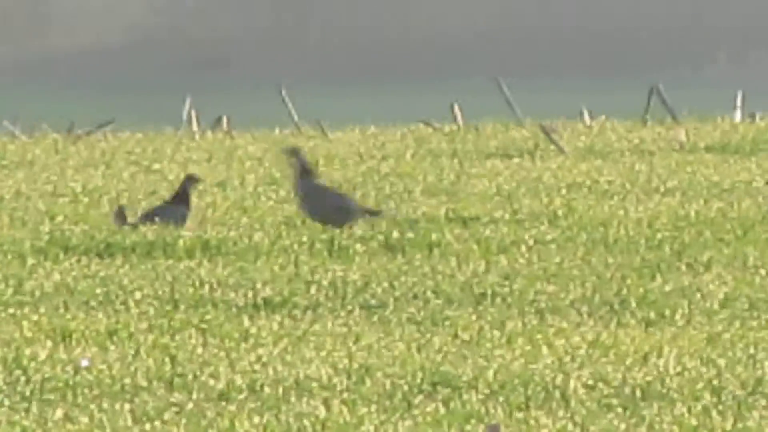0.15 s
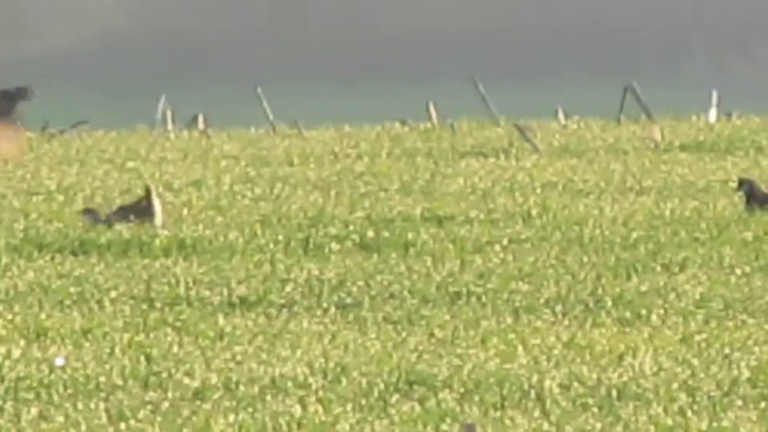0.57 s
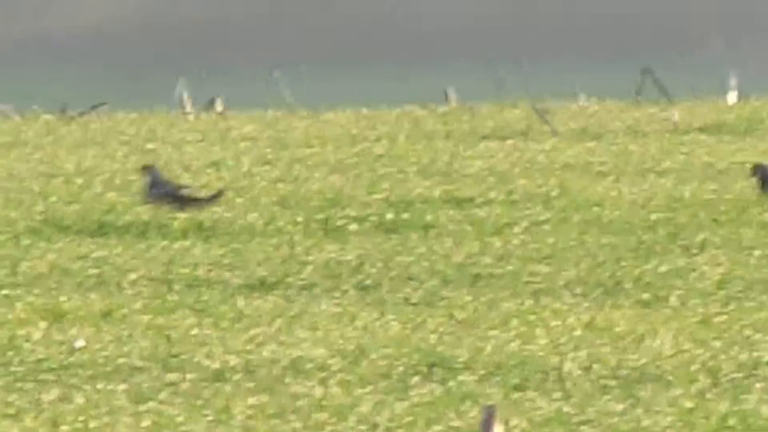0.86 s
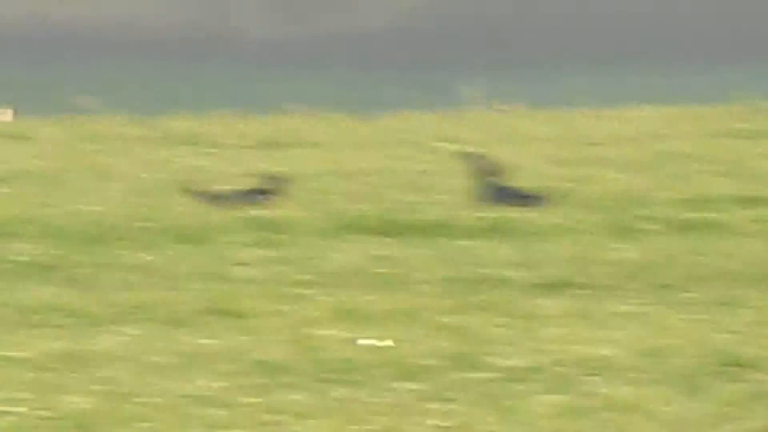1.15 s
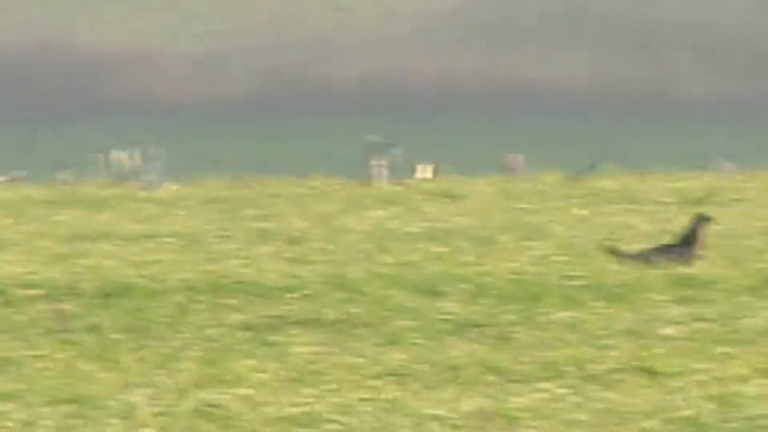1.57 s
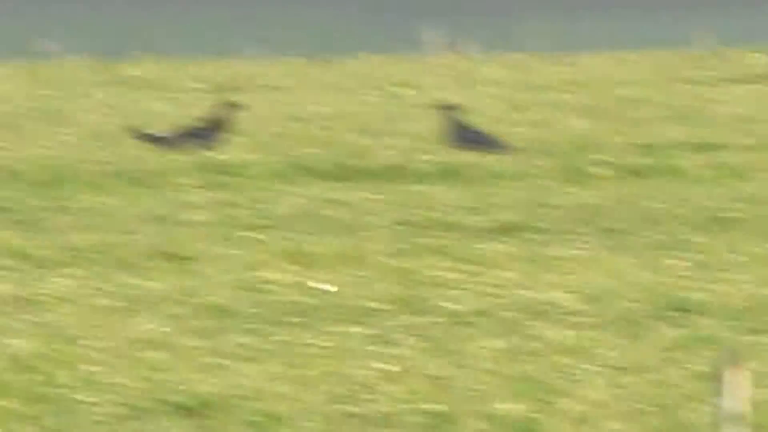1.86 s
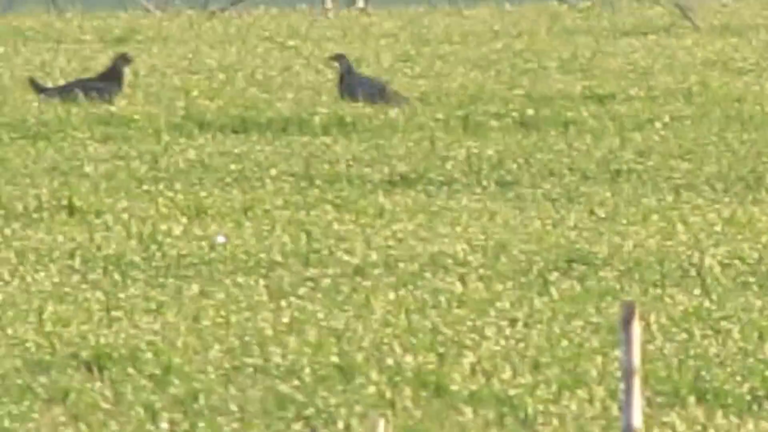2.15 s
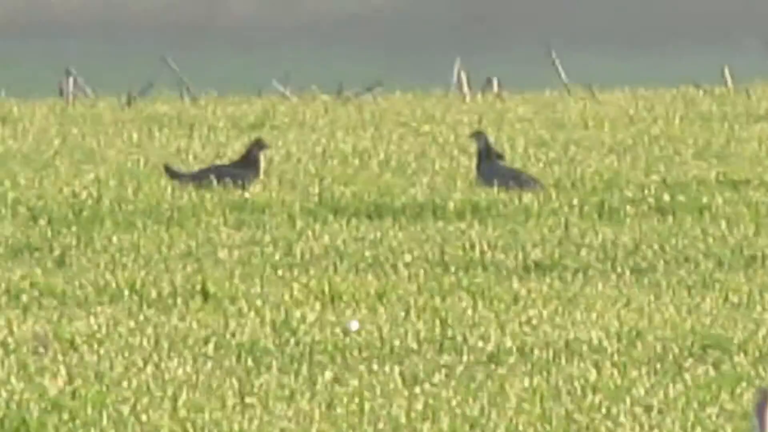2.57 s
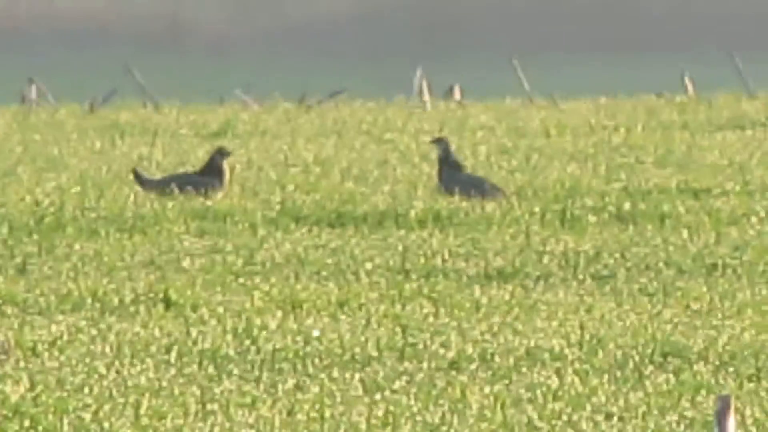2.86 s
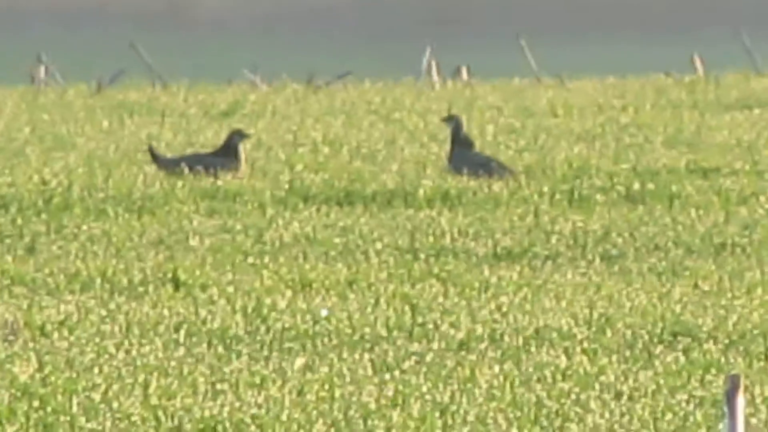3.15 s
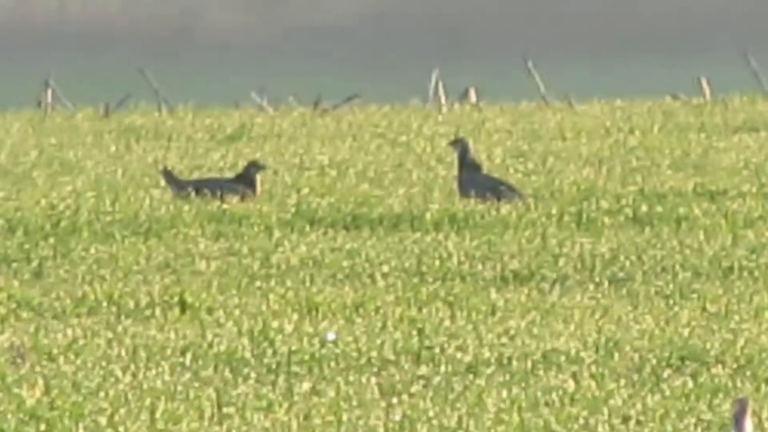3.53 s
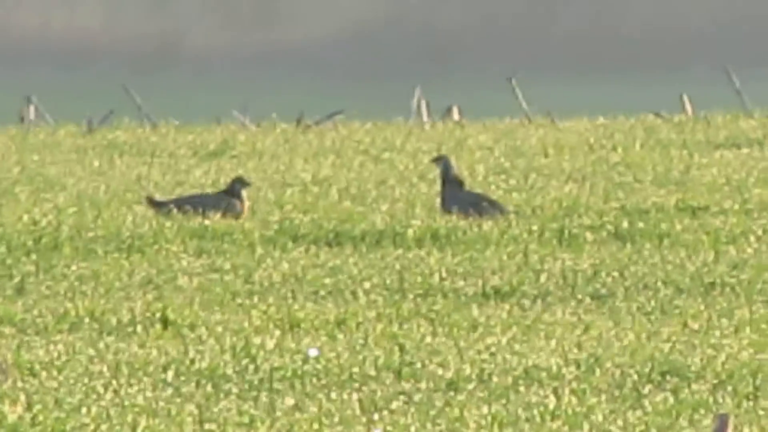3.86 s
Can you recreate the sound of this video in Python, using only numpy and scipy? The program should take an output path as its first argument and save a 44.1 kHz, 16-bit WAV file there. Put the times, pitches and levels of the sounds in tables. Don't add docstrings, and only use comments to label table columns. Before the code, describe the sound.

Low wind rumble dominates, gusty at first, calmer in the middle, then strongest at the close with slight overload crackle. Behind it are very faint distant songbirds, thin hiss, and a few tiny camera-body ticks near the microphone.

```python
import sys
import numpy as np
from scipy import signal
from scipy.fft import rfft, irfft
from scipy.io import wavfile
from scipy.ndimage import uniform_filter1d, minimum_filter1d

SR = 44100
rng = np.random.default_rng(int(sys.argv[2]) if len(sys.argv) > 2 else 0)


def generate_wav(sig):
    pcm = np.round(np.clip(np.atleast_2d(sig).T, -1, 1) * 32767).astype(np.int16)
    wavfile.write(sys.argv[1], SR, pcm)


def volts_from_decibels(level):
    exponent = np.asarray(level, float) / 20
    return 10 ** exponent


N = 176400


def evened(x):
    return x / np.sqrt(np.mean(x ** 2) + 1e-20)


def read(points, hz):
    f, value = np.transpose(points)
    return np.interp(np.log(hz + 1), np.log(f + 1), value)


def add(mix, s, sound):
    part = mix[..., max(round(s * SR), 0):][..., :sound.shape[-1]]
    part += sound[..., :part.shape[-1]]


def eddy_train(size):
    eddies_per_s, spread_db = 900, 3.5
    u, sign, big = rng.random((size, 3)).T
    kicks = (u < eddies_per_s / SR) * np.sign(sign - .5)
    return kicks * volts_from_decibels(-spread_db * np.log(big + 0.01))


def eddy_colour(hz, fall, cut_hz):
    return volts_from_decibels(-fall * hz / 1000) * hz ** 2 / (hz ** 2 + cut_hz ** 2)


def breeze(port):
    # t/s, left port level/dB, right port level/dB
    breeze_levels = [(0.0, -20, -21.5), (0.239, -21, -29), (0.332, -32, -29), (0.448, -21, -33),
                     (0.781, -38, -25), (0.87, -39.5, -35), (1.05, -28.5, -30.5), (1.45, -35, -33),
                     (1.85, -26.5, -25), (1.931, -32.5, -26), (2.048, -23, -23.5), (2.448, -26, -21),
                     (2.55, -30.5, -39), (2.721, -41, -45), (2.851, -29.5, -30), (3.4, -27.5, -28.5),
                     (3.797, -15, -23), (4.0, -14.5, -19.5)]
    s, level_db = np.transpose(breeze_levels)[[0, port]]
    hz, t, z = signal.stft(eddy_train(N), SR, nperseg=2048)
    fall = 25.6 - 2.5 * np.interp(t, s, level_db)
    colour = eddy_colour(hz[:, None], fall, cut_hz=53.4)
    z = z * colour / (np.linalg.norm(colour, axis=0) + 1e-9)
    x = signal.istft(z, SR, nperseg=2048)[1][:N]
    x = x / (abs(uniform_filter1d(x ** 2, size=4000)) + 1e-20) ** .5
    return x * volts_from_decibels(2 + np.interp(np.arange(N) / SR, s, level_db))


def gusts(rows):
    gust_s, gust_db, core = 0.012, -1, 7.53
    size = 8192
    half = size // 2
    out = np.zeros(N + size)
    t = (np.arange(size) - half) / SR
    hz = np.fft.rfftfreq(size, 1 / SR)
    for s, level_db, fall in rows:
        train = eddy_train(size)
        train[half] += core * rng.choice([-1, 1])
        train = train * np.exp(-.5 * (t / gust_s) ** 2)
        clump = irfft(rfft(train) * eddy_colour(hz, fall, cut_hz=74))
        add(out, s, volts_from_decibels(level_db + gust_db) * clump / np.std(clump[abs(t) < gust_s]))
    return out[half:N + half]


def wind():
    # t/s, level/dB, spectral fall/(dB per kHz)
    left_gusts = [(0.066, -9.5, 61), (0.231, -17, 40.5), (0.464, -14, 61.5), (0.563, -17.0, 64),
                  (0.645, -17.5, 83), (0.995, -13, 80), (1.109, -14.5, 77), (1.244, -20.5, 81),
                  (1.664, -23.5, 97), (1.843, -30.5, 44), (2.065, -14, 70), (2.146, -12, 88),
                  (2.201, -14.5, 63), (2.306, -15, 71), (2.462, -14.5, 84), (2.831, -13.5, 96),
                  (3.123, -14, 83), (3.208, -9, 89), (3.49, -17, 62), (3.607, -19.5, 48),
                  (3.664, -16.5, 49), (3.734, -13.5, 41.5), (3.828, -21, 15.5), (3.862, -11, 23),
                  (3.931, -17.5, 30.5), (3.982, -11, 28), (0.285, -21, 62), (0.401, -27, 57),
                  (1.313, -25.5, 80), (1.51, -26.5, 75), (1.775, -29, 65), (1.991, -8, 77),
                  (2.264, -25, 60), (2.63, -29, 79), (3.301, -20, 71), (3.326, -21, 69),
                  (3.771, -20.5, 49.5), (3.887, -17, 34.5), (3.957, -17.5, 27)]
    # t/s, level/dB, spectral fall/(dB per kHz)
    right_gusts = [(0.093, -12.5, 74), (0.125, -15.5, 41), (0.169, -13, 51), (0.275, -18.5, 58.5),
                   (0.425, -9.5, 53.5), (0.48, -14.5, 62.5), (0.618, -19, 57), (0.78, -19.5, 58),
                   (1.245, -16, 82), (1.412, -15, 66), (1.722, -14.5, 90), (1.854, -14, 84),
                   (2.151, -13, 68.5), (2.232, -19, 66), (2.301, -17.5, 62), (2.438, -10.5, 67),
                   (2.946, -14.5, 78), (3.001, -12, 71), (3.166, -9.5, 55), (3.204, -12, 52),
                   (3.449, -13, 60), (3.528, -9.5, 71), (3.59, -8.5, 57), (3.668, -8, 52),
                   (3.837, -6.5, 39), (3.935, -12, 40), (0.023, -18.5, 50.5), (0.192, -15.5, 40),
                   (0.58, -24, 63), (0.717, -17, 73), (1.001, -24, 79), (1.099, -24.5, 69),
                   (1.334, -27, 79), (1.528, -24, 81), (1.782, -19.5, 73), (2.019, -18.5, 61),
                   (2.063, -20.5, 56), (2.349, -14, 59), (2.555, -21, 104), (2.618, -28, 84),
                   (3.232, -13.5, 67), (3.715, -15, 39), (3.796, -13, 53), (3.861, -15.5, 33.5)]
    left = breeze(port=1) + gusts(left_gusts)
    right = breeze(port=2) + gusts(right_gusts)
    widen = .5
    return np.array([left - widen * right, right - widen * left])


def hiss():
    # t/s, hiss level/dB
    gain_ride = [
        (0, -78.5),
        (0.498, -80.5),
        (1.102, -76),
        (2, -75),
        (3.1, -74.5),
        (3.2, -76.5),
        (3.802, -76),
        (3.85, -82),
    ]
    # f/Hz, density/(dB per Hz)
    hiss_tone = [(300, 4), (950, 2), (1500, -4), (2800, -10), (5500, -14.5), (10000, -18.5), (15700, -24.5)]
    # f/Hz, share
    likeness = [(1000, -0.34), (3100, 0.061)]
    frames, hz = N // 256 + 5, np.fft.rfftfreq(1024, 1 / SR)
    a, b, c, d, patches = rng.standard_normal((frames, 513, 5)).T
    patches = evened(uniform_filter1d(uniform_filter1d(patches, 10, 0), 8, 1))
    same = np.clip(read(likeness, hz), -1, 1)[:, None]
    left = a + 1j * b
    right = same * left + np.sqrt(1 - same ** 2) * (c + 1j * d)
    low_cut = hz[:, None] ** 2 / (hz[:, None] ** 2 + 300 ** 2)
    z = np.array([left, right]) * volts_from_decibels(read(hiss_tone, hz)[:, None] + 1.3 * patches) * low_cut
    x = evened(signal.istft(z, nperseg=1024, noverlap=768)[1][:, :N])
    level_db = 14 + np.interp(np.arange(N) / SR, *np.transpose(gain_ride))
    return x * volts_from_decibels(level_db) * np.array([[1.1], [.9]])


def overload_snaps():
    # t/s, peak level/dB, left over right/dB
    snap_events = [(0.0188, -48, 3), (0.0708, -29, 6.5), (3.1682, -29.5, -5.5), (3.17, -34, 2),
                   (3.214, -35.5, 3), (3.731, -39.5, 5.5), (3.7565, -42.5, -1), (3.7665, -32.5, 4),
                   (3.795, -39, -3), (3.802, -38.5, -4.5), (3.822, -39.5, -8.5), (3.836, -41, 2.5)]
    out, t = np.zeros((2, N)), np.arange(2000) / SR
    rate = 2 * np.pi * 3000
    kink = (1 - rate * t / 3) * np.exp(-rate * t)
    for s, db, pan_db in snap_events:
        add(out, s, volts_from_decibels(db) * np.outer([volts_from_decibels(pan_db / 2), -volts_from_decibels(-pan_db / 2)], 2 * kink))
    return out


def note(length, from_hz, to_hz, level_db, husk_hz, swell_db):
    u = np.linspace(0, 1, round(length * SR))
    turn = np.exp(2j * np.pi * np.cumsum(from_hz + (to_hz - from_hz) * u) / SR)
    r = np.exp(-np.pi * husk_hz / SR)
    flutter = signal.lfilter([1], [1, -r], rng.standard_normal((2, len(u) + 999)))[:, -len(u):]
    flutter = (flutter[0] + 1j * flutter[1]) * np.sqrt(1 - r * r)
    wobble = .3 * flutter + .7 if husk_hz < 200 else .6 * flutter
    arch = abs(np.sin(np.pi * u)) ** 0.23
    return volts_from_decibels(level_db + swell_db * (u - .5)) * arch * (turn * wobble).real


def sing(rows, husk_hz, swell_db=0):
    out = np.zeros(N)
    for s, *row in rows:
        add(out, s, note(*row, husk_hz, swell_db))
    return out


def trill(first, rate, length, from_hz, to_hz, level_db, swell_db, count):
    notes = []
    for k in range(count):
        swell = -swell_db * abs(2 * k / count - 1.1)
        uneven = 1.2 * rng.standard_normal()
        notes.append((first + k / rate, length, from_hz, to_hz, level_db + swell + uneven))
    return notes


def warbling():
    # delay/s, length/s, from f/Hz, to f/Hz, level/dB
    warble_notes = [
        (0, 0.032, 1970, 2350, -64.5),
        (0.015, 0.038, 2070, 2650, -68.5),
        (0.028, .08, 1980, 1990, -65.5),
        (0.107, 0.016, 2450, 2000, -57.5),
        (0.125, 0.033, 2414, 2010, -61),
    ]
    # t/s, level/dB, pitch factor
    warble_calls = [
        (1.942, -7, 0.82),
        (2.295, -1, 0.97),
        (2.934, 5.5, 0.99),
        (3.584, -1, 0.97),
    ]
    return [(s + delay, length, a * pitch, b * pitch, db + up)
            for s, up, pitch in warble_calls
            for delay, length, a, b, db in warble_notes]


def birds():
    # t/s, length/s, from f/Hz, to f/Hz, level/dB
    right_whistles = [
        (.04, 0.11, 3240, 2870, -73),
        (.44, 0.096, 3150, 2980, -67),
        (.555, 0.082, 2810, 2690, -69.5),
        (2.105, 0.135, 6350, 4500, -66.5),
    ]
    whistle_notes = [(.301, 0.17, 4400, 4040, -78), (.531, .205, 3490, 3240, -75.5),
                     (.741, 0.18, 3380, 3405, -74), (1.951, 0.11, 1810, 1694, -73),
                     (2.581, 0.065, 1475, 1465, -66), (2.858, 0.15, 5670, 5080, -65.5),
                     (3.026, .052, 5000, 4900, -63), (3.081, 0.072, 4710, 4110, -61.5),
                     (3.331, 0.12, 4860, 4540, -60.5), (3.456, 0.08, 4730, 4710, -66),
                     (3.545, 0.12, 3840, 3390, -62.5), (3.598, 0.057, 5840, 4560, -64.5)]
    chirp_notes = [(.306, .026, 2330, 2280, -70), (1.442, .066, 4640, 3830, -67),
                   (1.509, .022, 3920, 4040, -62.5), (1.753, 0.046, 4790, 4420, -69),
                   (1.808, 0.034, 4100, 4090, -64), (2.031, 0.052, 2300, 2123, -64),
                   (2.641, 0.029, 1913, 1506, -59), (2.646, 0.043, 1048, 744, -60),
                   (2.691, .031, 1063, 840, -62.5), (2.781, 0.033, 757, 818, -61),
                   (2.791, .091, 4030, 3820, -66), (2.801, .081, 3660, 3490, -64.5),
                   (2.866, .061, 3740, 4740, -60.5), (3.246, 0.035, 2116, 1955, -64),
                   (3.411, .041, 2015, 2210, -64)]
    fading_notes = [
        (3.161, 0.055, 4170, 4160, -69),
        (3.649, .031, 3380, 3600, -71),
        (3.676, .325, 3574, 3505, -68),
    ]
    low_trill = trill(first=1.151, rate=16.3, length=.03, from_hz=930, to_hz=815,
                      level_db=-59, swell_db=3, count=12)
    flicks = trill(first=2.981, rate=15.05, length=.018, from_hz=3850, to_hz=5750,
                   level_db=-61, swell_db=12.5, count=13)
    high_trill = trill(first=2.983, rate=15.05, length=.011, from_hz=4250, to_hz=4500,
                       level_db=-54, swell_db=15, count=13)
    left = sing(whistle_notes, husk_hz=40, swell_db=8.5)
    left += sing(chirp_notes, husk_hz=260)
    left += sing(high_trill + low_trill + warbling(), husk_hz=190)
    left += sing(flicks, husk_hz=400)
    left += sing(fading_notes, husk_hz=60, swell_db=-15)
    right = sing(right_whistles, husk_hz=40)
    return np.outer([1.3, .7], left) + np.outer([.3, 1.6], right)


def jabs():
    # t/s, peak level/dB, spectral fall/(dB per kHz)
    jab_events = [(0.094, -26, 27.5), (0.124, -25, 26), (2.024, -25.5, 39.5), (3.167, -19.5, 24),
                  (3.204, -22, 31), (3.589, -18.5, 31.5), (3.768, -20, 31), (3.859, -21, 11.5),
                  (3.884, -26.5, 16), (3.96, -21.5, 16), (3.98, -18, 15.5)]
    out, hz = np.zeros(N + 2048), np.fft.rfftfreq(2048, 1 / SR)
    for k, (s, db, fall) in enumerate(jab_events):
        bump = np.roll(irfft(eddy_colour(hz, fall, cut_hz=110)), shift=1024)
        add(out, s, (-1) ** k * volts_from_decibels(db) * bump / bump.max())
    return np.outer([1.6, .4], out[1024:N + 1024])


def body_knock():
    # f/Hz, level/dB, t60/s
    knock_modes = [(1200, -2.5, 0.028), (1480, 5.5, 0.016), (1820, 6, 0.029), (2510, -3.5, 0.035),
                   (3710, -7, .03)]
    out, t = np.zeros((2, N)), np.arange(2000) / SR
    ring = sum(volts_from_decibels(db - 60 * t / t60) * np.sin(2 * np.pi * hz * t) for hz, db, t60 in knock_modes)
    ring = ring * np.minimum(t / 0.00041, 1)
    add(out, .5215, volts_from_decibels(-44.5) * np.outer([1.8, -.3], ring))
    return out


def body_ticks():
    # t/s, peak level/dB
    tick_events = [(0.95, -59), (1.0106, -62.5), (1.195, -52.5), (1.2461, -53), (1.257, -61), (1.261, -61),
                   (1.3364, -50.5), (1.4463, -55.5), (0.943, -65.5), (1.026, -65), (1.055, -62),
                   (1.066, -58), (1.1, -57), (1.118, -67.5), (1.207, -60), (1.302, -62), (1.376, -65)]
    out, t = np.zeros((2, N)), np.arange(2000) / SR
    ping = np.sin(2 * np.pi * 8800 * t) * np.exp(-t / 0.0001)
    for s, db in tick_events:
        burst = 0.6 * np.diff(rng.standard_normal(2001)) * np.exp(-t / 0.00044)
        add(out, s, volts_from_decibels(db + 11.5) * np.outer([-.6, 1.4], burst + ping))
    return out


def scene():
    weather = wind() + jabs() + overload_snaps()
    return weather + hiss() + birds() + body_knock() + body_ticks()


def low_pass(x):
    return signal.sosfilt(signal.butter(12, 15850, fs=SR, output="sos"), x)


def record(dry):
    ceiling = .97
    room = minimum_filter1d(np.minimum(ceiling / (abs(dry) + 1e-9), 1), size=441)
    dry = dry * uniform_filter1d(uniform_filter1d(room, size=220), size=220)
    dry = dry * np.minimum(np.arange(N)[::-1] / 60, 1)
    return low_pass(dry)


dry = scene()
out = record(dry)
generate_wav(out)
```